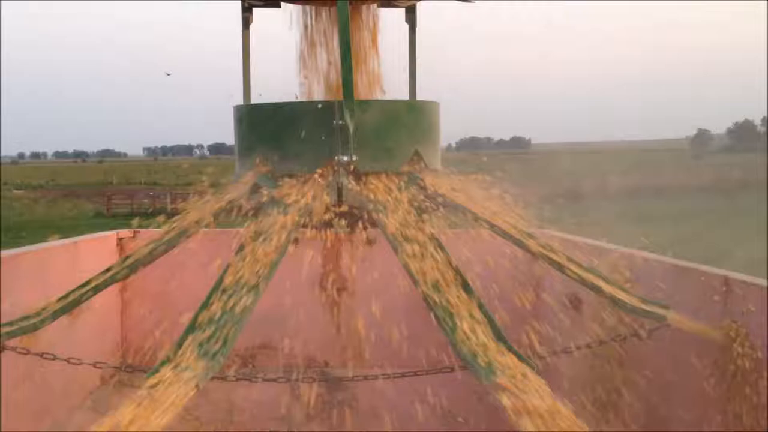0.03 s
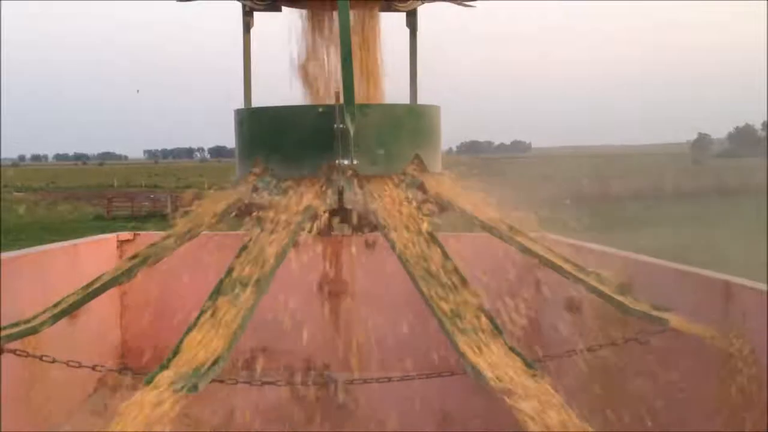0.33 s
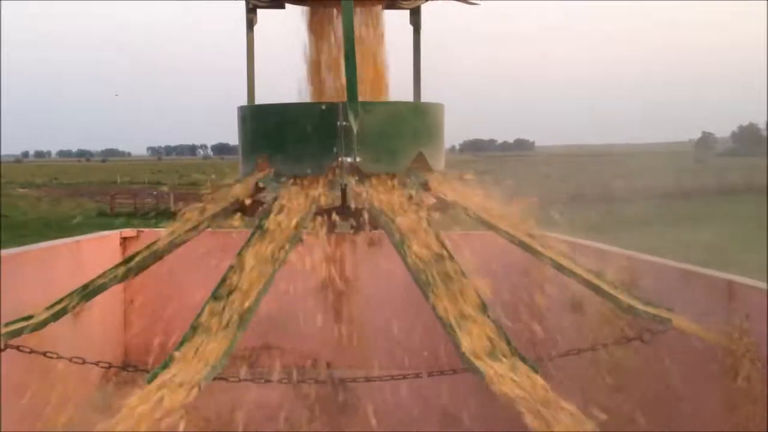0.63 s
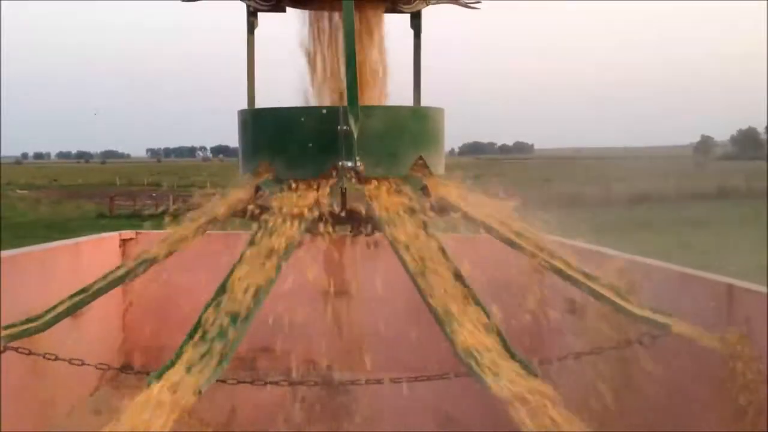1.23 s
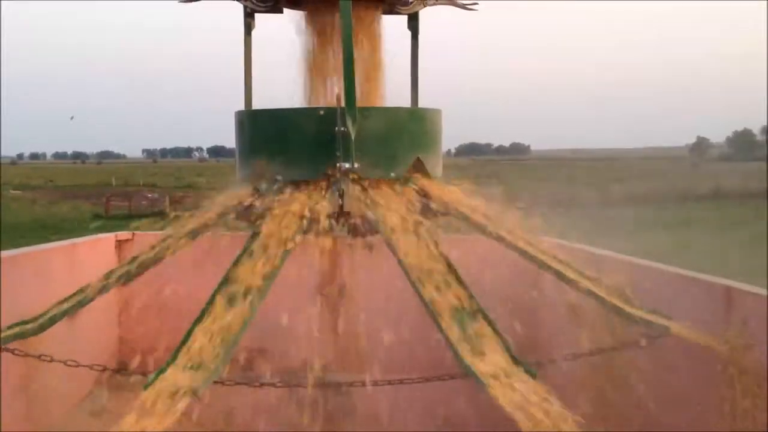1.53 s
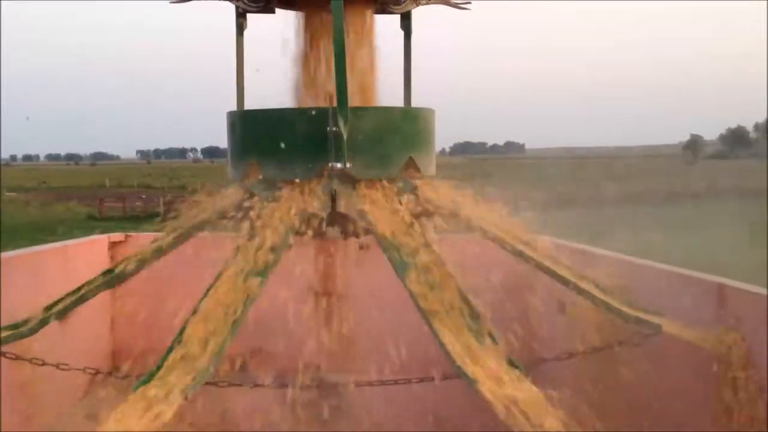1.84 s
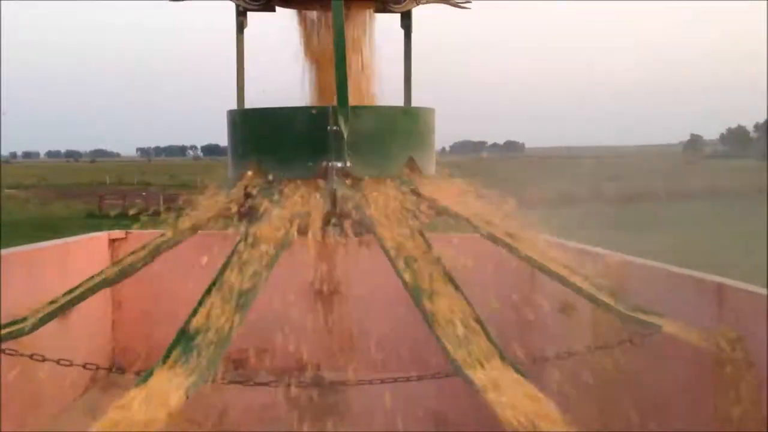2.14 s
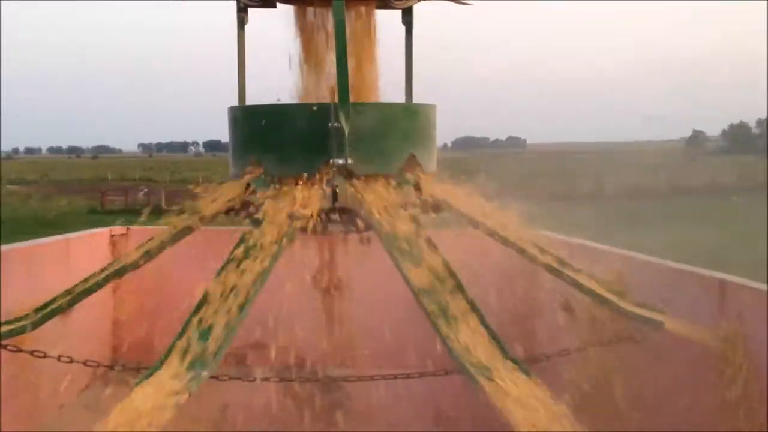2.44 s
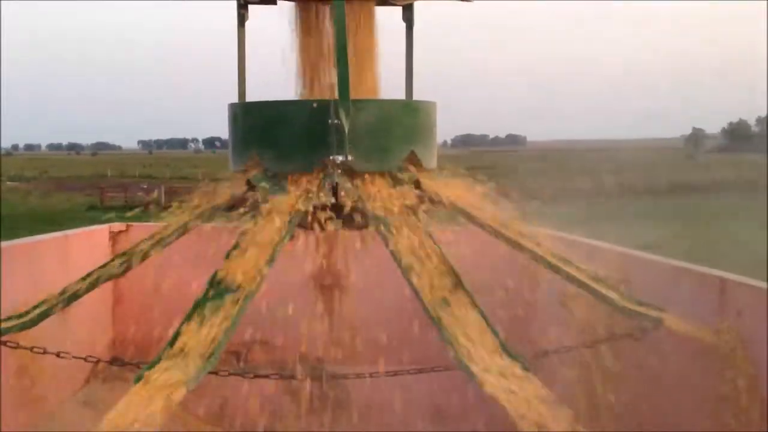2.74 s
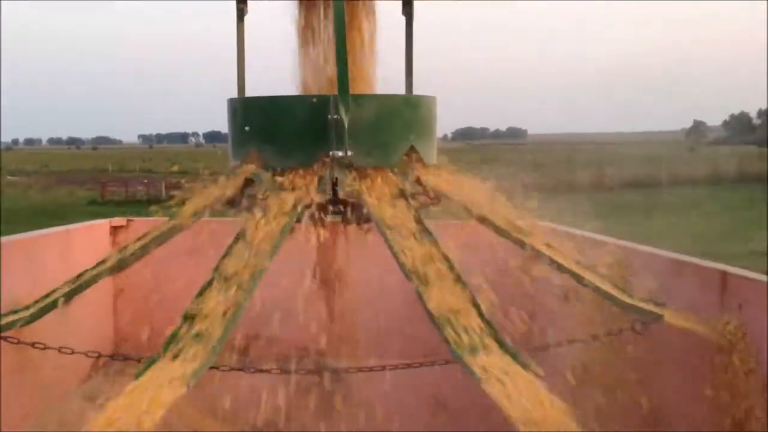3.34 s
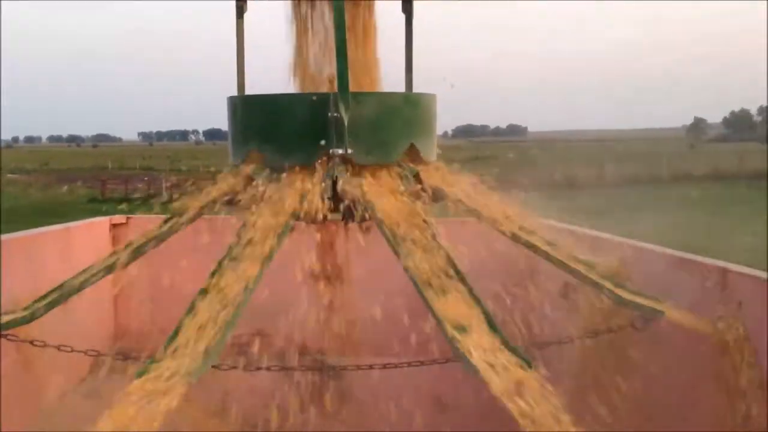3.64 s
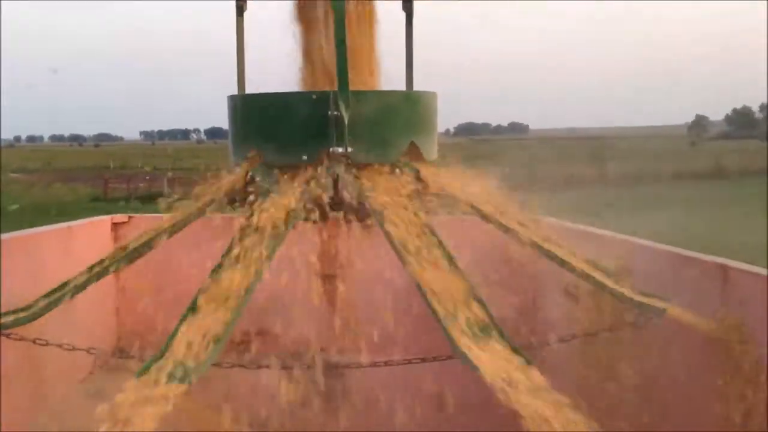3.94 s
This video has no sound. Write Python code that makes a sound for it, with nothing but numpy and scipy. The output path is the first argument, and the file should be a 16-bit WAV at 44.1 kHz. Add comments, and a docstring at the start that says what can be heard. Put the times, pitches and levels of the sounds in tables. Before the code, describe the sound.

Corn pouring onto a steel spreader cuts in abruptly at 0.1 seconds, close by outdoors. Countless kernel ticks merge with a bright sliding hiss and light metallic ringing, swelling slightly and continuing until about 4 seconds. The rush stutters very briefly several times between 0.6 and 2.2 seconds, and again near 3.5. Underneath, grain lands in a wagon with soft drumming and occasional faint booms, over a faint, low machine hum.

```python
"""A bright rush cuts in abruptly: corn pouring onto a steel spreader, outdoors, close by.
Thousands of kernel ticks a second merge with the hiss of grain sliding down the chutes;
the rush swells with the flow, sets the steel ringing and stutters now and then.
Underneath, the grain lands in a wagon with soft drumming and booms, and a machine hums."""
import sys
import numpy as np
from scipy import signal
from scipy.fft import rfft, irfft
from scipy.io import wavfile
from scipy.ndimage import uniform_filter1d

SR = 44100
rng = np.random.default_rng(int(sys.argv[2]) if len(sys.argv) > 2 else 0)


def wrap_up_sound(samples):
    """Save the sound to the file named by the first command line argument, as 16-bit audio."""
    columns = np.atleast_2d(samples).T
    # keep every value between -1 and 1, then stretch to whole-number steps
    tamed = np.clip(columns, -1, 1)
    steps = np.round(tamed * 32767).astype(np.int16)
    wavfile.write(sys.argv[1], SR, steps)


N = 176400


# Spectrum of a kernel's tick on steel: f/Hz, relative level/dB
TICK_SPECTRUM = [(300, -32), (1100, -18.5), (1450, -10), (2150, -9), (2450, -5.5), (3050, -6.5), (3500, -3),
                 (4700, -1), (5500, -3.5), (6700, -1), (9000, -2.5), (12000, -6.5), (15300, -9)]

def kernel_ticks(level_db=-14.5, hits_per_s=14000, t60_s=0.0043, spots=24):
    """Kernels strike many spots; each answers with its own very short crack."""
    t = np.arange(512) / SR
    ticks = np.zeros(N)
    for _ in range(spots):
        crack = unit(rng.standard_normal(len(t)) * decay(t, t60_s))
        hits = impacts(hits_per_s / spots, spread_db=2)
        ticks += signal.oaconvolve(hits, crack)[:N]
    return amp(level_db) * colour(ticks, TICK_SPECTRUM)


# Spectrum of sliding grain: f/Hz, relative level/dB
SLIDE_SPECTRUM = [(300, -30), (1100, -13.5), (1500, -13), (2100, -11.5), (2600, -4.5), (4000, -4.5),
                  (7000, -0.5), (10000, -1.5), (15300, -11.5)]

def chute_slide(level_db=-15):
    """The mass of grain rushes over the chutes."""
    return amp(level_db) * patchy_noise(SLIDE_SPECTRUM, patch_db=1.13, frames=14, bins=50)


def chinks(level_db=-18.5, hits_per_s=2400, t60_s=0.12, low_hz=1302, high_hz=14994, spots=1200):
    """Glancing kernels make spots of thin steel chink, each at its own pitch."""
    t = np.arange(6000) / SR
    pitch_hz = rng.uniform(low_hz, high_hz, spots)
    hits = impacts(hits_per_s, spread_db=2.1)
    rings = np.sin(2 * np.pi * pitch_hz[:, None] * t) * decay(t, t60_s)
    struck_spot = rng.integers(0, spots, N)
    out = np.zeros(N + len(t))
    for at in np.flatnonzero(hits):
        out[at:at + len(t)] += hits[at] * rings[struck_spot[at]]
    return amp(level_db) * colour(out[:N], TICK_SPECTRUM)


# Modes of the steel ring and chutes: f/Hz, relative level/dB, t60/s
STEEL_MODES = [(406.6, -15, 0.23), (1323, -12, 0.15), (1452, -11.5, 0.072), (1635, -20.5, .25),
               (1686, -7, 0.35), (1955, -5, 0.12), (2520, -10, 0.12), (2569, -2.5, 0.09), (2908, -3.5, 0.1),
               (3270, -4, 0.11), (3390, -1, 0.14), (3790, -4.5, 0.1), (4037, 0, .1), (4300, 2.5, 0.12),
               (4604, 1, 0.08), (5170, 0, 0.046), (5904, 0.5, 0.078), (6595, 1.5, 0.063)]

def steel_ring(level_db=-24, hits_per_s=4000):
    """The hail of kernels keeps the steel's modes ringing."""
    t = np.arange(SR // 2) / SR
    ring = np.zeros(len(t))
    for hz, db, t60_s in STEEL_MODES:
        mode = np.sin(2 * np.pi * (hz * t + rng.random()))
        ring += amp(db) * unit(decay(t, t60_s) * mode)
    hits = impacts(hits_per_s, spread_db=2)
    return amp(level_db) * unit(signal.oaconvolve(hits, ring)[:N])


# Spectrum of landing grain: f/Hz, relative level/dB
DRUM_SPECTRUM = [(20, -26), (40, -25), (60, -14), (90, 0), (115, -1.5), (142, 1.5), (170, -0.5),
                 (280, -3.5), (520, -3), (900, -6.5), (1500, -18), (4000, -43)]

def wagon_drumming(level_db=-34):
    """Grain lands on the heap and the wagon's walls."""
    return amp(level_db) * patchy_noise(DRUM_SPECTRUM, patch_db=1.45, frames=16, bins=5)


# Heavier slugs of grain: centre t/s, f/Hz, level/dB
GRAIN_SLUGS = [(.22, 150, -40.5), (.74, 147.4, -42.5), (1.08, 145.5, -40), (1.3, 140, -37.5),
               (2.21, 138, -38), (3.19, 197, -36.5), (3.22, 290, -40), (3.92, 132, -40.5)]

def wall_booms(half_width_s=0.04, waver_hz=8):
    """Each slug draws a soft, unsteady boom from the wagon's wall."""
    t = np.arange(N) / SR
    waver_cycles = np.cumsum(waver_hz * wander(rate_hz=34)) / SR
    booms = np.zeros(N)
    for centre_s, hz, db in GRAIN_SLUGS:
        swell = np.exp(-((t - centre_s) / half_width_s) ** 2)
        booms += amp(db) * swell * unit(np.sin(2 * np.pi * (hz * t + waver_cycles)))
    return booms


def machine_hum(level_db=-47, waver_db=3.5, pitch_hz=51.5, drift_hz=0.19):
    """The machine feeding the grain gives one low, wavering tone."""
    cycles = np.cumsum(pitch_hz + drift_hz * wander(rate_hz=3.3)) / SR
    gain = amp(level_db + waver_db * wander(rate_hz=4.1))
    return gain * unit(np.sin(2 * np.pi * cycles))


# Stutters: centre t/s, length/s, deepest dip of the rush/dB
STUTTER_DIPS = [(0.624, .032, -18), (0.822, 0.033, -19), (1.242, .028, -24), (1.377, 0.034, -17),
                (1.479, .032, -16), (1.823, .034, -16), (2.183, 0.031, -21), (3.473, 0.051, -29)]

def stutter(x, buzz_db=-0.8, low_hz=1200, partials_per_s=780, evenness=0.45, sharpness=1.6):
    """The rush briefly loses its bass and freezes into a thin buzz of its most prominent partials."""
    size = 1024
    t, hz = np.arange(N) / SR, np.fft.rfftfreq(size, 1 / SR)
    baseline = amp(evenness * spectrum_db(TICK_SPECTRUM, hz))
    out = x.copy()
    for centre_s, length_s, dip_db in STUTTER_DIPS:
        span = np.flatnonzero(abs(t - centre_s) < length_s / 2)
        frame = x[span[0]:][:size] * np.hanning(size)
        strength = abs(rfft(frame)) * (hz > low_hz)
        peaks = signal.find_peaks(strength, distance=5)[0]
        ranked = peaks[np.argsort((strength / baseline)[peaks])]
        held = ranked[-round(partials_per_s * length_s):]
        phase = rng.random(len(hz))
        tones = sum(strength[k] * np.sin(2 * np.pi * (hz[k] * t[span] + phase[k])) for k in held)
        buzz = amp(buzz_db) * x[span].std() * unit(tones)
        triangle = 1 - 2 * abs(t[span] - centre_s) / length_s
        rush_gain = np.minimum(amp(dip_db * triangle ** sharpness), 1)
        out[span] = rush_gain * x[span] + np.sqrt(1 - rush_gain ** 2) * buzz
    return out


def impacts(per_s, spread_db):
    """Random blows, mostly small, a few hard."""
    force = amp(spread_db * np.minimum(rng.exponential(1, N), 5))
    return force * rng.choice([-1, 1], N) * (rng.random(N) < per_s / SR)


def patchy_noise(spectrum, patch_db, frames, bins):
    """Coloured noise whose level drifts in time-frequency patches."""
    real, imag, patches = rng.standard_normal((3, N // 256 + 5, 513))
    patches = uniform_filter1d(patches, frames, axis=0)
    patches = unit(uniform_filter1d(patches, bins, axis=1))
    cells = (real + 1j * imag) * amp(patch_db * patches)
    _, noise = signal.istft(cells.T, nperseg=1024, noverlap=768)
    return colour(noise[:N], spectrum)


def wander(rate_hz):
    """Smooth random drift up to about rate_hz, rms 1."""
    ratio = np.fft.rfftfreq(N, 1 / SR) / rate_hz
    return unit(irfft(rfft(rng.standard_normal(N)) * ratio / (1 + ratio ** 2) ** 1.5, N))


def colour(x, spectrum):
    """Filters by a spectrum, to rms 1."""
    gain = amp(spectrum_db(spectrum, np.fft.rfftfreq(N, 1 / SR)))
    return unit(irfft(rfft(x) * gain, N))


def spectrum_db(spectrum, hz):
    """Interpolates on a log-frequency axis."""
    knots_hz, db = np.transpose(spectrum)
    return np.interp(np.log(hz + 1), np.log(knots_hz + 1), db)


def decay(t, t60_s):
    """Falls 60 dB in t60_s."""
    return np.exp(-np.log(1000) * t / t60_s)


def amp(db):
    """Decibels to gain."""
    return 10 ** (np.asarray(db) / 20)


def unit(x):
    """Scales to rms 1."""
    return x / np.sqrt(np.mean(x ** 2) + 1e-20)


# Strength of the stream: t/s, level/dB before scaling by flow_depth
GRAIN_FLOW = [(0.11, -1.9), (0.24, -0.6), (0.3, 0.4), (0.35, -0.4), (0.49, -1.1), (0.64, 0.7), (0.69, -0.4),
              (0.78, 0.5), (0.86, -1.4), (1.03, 0.5), (1.1, 0.5), (1.17, -1.5), (1.22, 0), (1.3, 0.6),
              (1.37, 1.5), (1.46, 1.5), (1.51, -0.7), (1.56, 1), (1.6, -2.5), (1.67, 0.5), (2.25, -0.1),
              (2.31, -1.5), (2.41, 1), (2.48, 0.5), (2.58, 0.8), (2.63, -2), (2.7, 0.4), (2.75, -2),
              (2.79, -0.4), (2.85, 0.3), (2.94, 0.7), (3.05, -2), (3.21, 0.1), (3.27, -1), (3.44, 1.5),
              (3.51, 1.1), (3.59, 0.5), (3.73, -1), (3.78, -1), (4.0, 0.3)]

def scene(flow_depth=0.84, clump_db=0.35):
    """The spreader follows the flow, over wagon and machine; both channels alike."""
    flow_db = flow_depth * np.interp(np.arange(N) / SR, *np.transpose(GRAIN_FLOW))
    flow_gain = amp(flow_db + clump_db * wander(rate_hz=11))
    spreader = flow_gain * (kernel_ticks() + chute_slide() + steel_ring() + chinks())
    mono = stutter(spreader + wagon_drumming() + machine_hum() + wall_booms())
    return np.array([mono, mono])


def record(dry, start_s=0.1052, rise_s=0.001, cutoff_hz=15300):
    """Abrupt start, full-scale clipping, low-pass."""
    gate = np.clip((np.arange(N) / SR - start_s) / rise_s, 0, 1)
    clipped = np.clip(dry * gate, -1, 1)
    lowpass = signal.firwin(1023, cutoff_hz, window=("kaiser", 9), fs=SR)
    return signal.oaconvolve(clipped, lowpass[None], "same")


dry = scene()
out = record(dry)
wrap_up_sound(out)
```